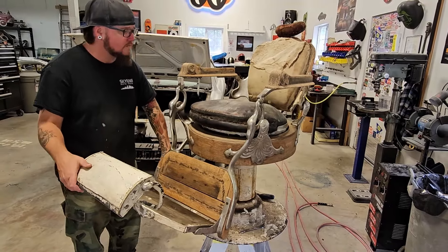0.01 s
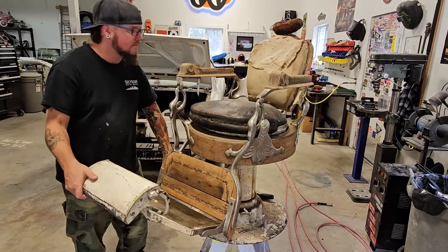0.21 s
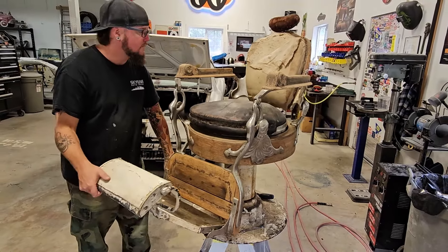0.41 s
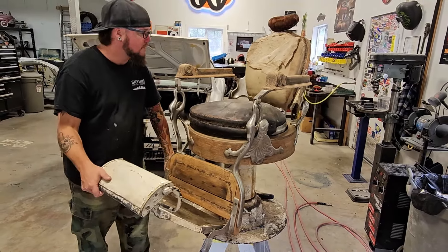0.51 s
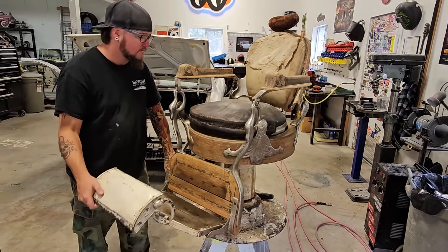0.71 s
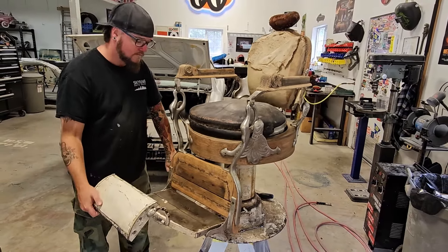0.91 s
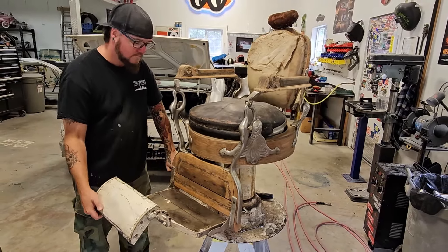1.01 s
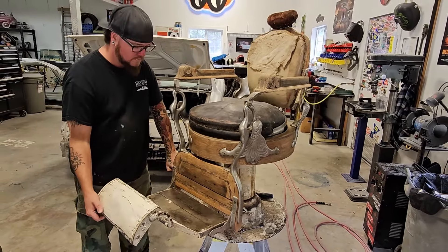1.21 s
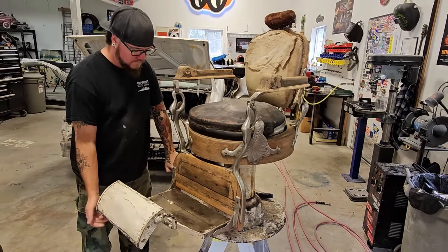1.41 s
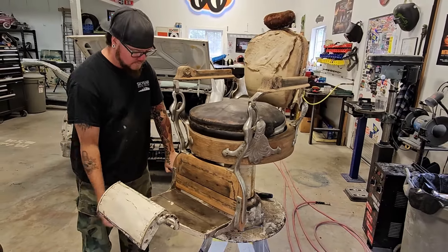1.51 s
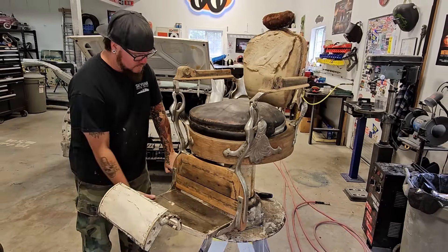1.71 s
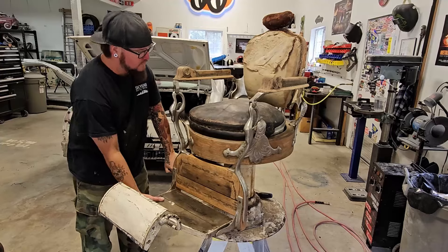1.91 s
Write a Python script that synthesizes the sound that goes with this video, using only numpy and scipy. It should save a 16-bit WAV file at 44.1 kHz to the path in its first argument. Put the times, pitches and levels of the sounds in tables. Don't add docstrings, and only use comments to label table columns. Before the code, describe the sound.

An old reclining chair is lowered: soft wooden knocks, a sharp loud linkage clunk with rattling, small latch ticks, then an iron footrest clang with bounces and a wooden thump, close to a phone in an echoing workshop.

```python
import sys
import numpy as np
from scipy import signal
from scipy.fft import rfft, irfft
from scipy.io import wavfile
from scipy.ndimage import uniform_filter1d

SR = 44100
rng = np.random.default_rng(int(sys.argv[2]) if len(sys.argv) > 2 else 0)


def rack_gain(trim_db):
    fader = np.asarray(trim_db, float)
    return 10 ** (fader / 20)


def persist_wave(psi):
    counts = np.round(np.clip(psi, -1, 1) * 32767).astype(np.int16)
    wavfile.write(sys.argv[1], SR, np.atleast_2d(counts).T)


N = 88200

# (f/Hz, level/dB per Hz)
HUM_COLOUR = [(15, -29.5), (25, -3), (59, -2), (106, -2), (260, -17.5), (1310, -26.5), (5280, -44),
              (7090, -52.5), (15000, -64.5)]
# (t/s, level/dB)
CLOTH_LEVEL = [(0.0, -54.5), (.12, -61), (.2, -69), (0.28, -45), (0.39, -52), (0.46, -42), (0.56, -57),
               (.7, -56.5), (0.84, -63), (.92, -68), (1.07, -67), (1.16, -64), (1.19, -85), (1.25, -70.5),
               (1.3, -58), (1.48, -58), (1.56, -83.5), (2.0, -94)]
# (t/s, level/dB, rise/s, fall/s, centre f/Hz)
SCUFF_EVENTS = [
    (.0, -47.5, 0.0015, 0.013, 4000),
    (0.486, -45, 0.012, 0.0073, 9900),
    (0.582, -31, 0.0026, 0.0086, 10300),
    (0.581, -37.5, 0.0075, 0.0024, 2920),
    (1.003, -62.5, 0.0054, 0.012, 10600),
    (1.26, -50.5, 0.0046, 0.013, 11000),
    (1.487, -68.5, 0.0058, 0.011, 10000),
    (1.887, -71, 0.005, 0.021, 6830),
]
# (t/s, peak level/dB, hardness/octaves above 1 kHz, chatter/s, knock f/Hz)
SEAT_BLOWS = [(.004, -33, -0.99, 0.064, 206), (.088, -29, -0.92, 0.014, 210),
              (.226, -19.5, -1.11, 0.028, 645), (.29, -23, -0.81, 0.014, 650),
              (.348, -18.5, -1.32, 0.023, 420), (.372, -25, -1.2, 0.0077, 560),
              (.43, -22, -1.18, 0.016, 495), (.47, -25.5, -1.9, 0.039, 216), (.89, -35, -1.5, 0.025, 206),
              (1.009, -29, -1.8, 0.026, 230), (1.049, -37.5, -2, 0.0055, 244)]
LINK_BLOWS = [(.064, -23.5, 0.5, 0.0095, 994), (.206, -33.5, 3, 0.012, 700), (.2225, 2.5, 3, 0.0032, 1300),
              (.245, -17, 5.5, 0.023, 2590), (.3, -18, 1.5, 0.029, 2100), (.349, -9.5, 2.5, 0.0092, 2120),
              (.362, -30, 1, .015, 1600), (.392, -37, 8, 0.013, 2100), (.432, -15.5, 1.5, 0.0024, 1380),
              (.469, -22, 2.5, 0.059, 565), (.53, -24, 2.5, 0.087, 1300), (.68, -31, 0, 0.0031, 860)]
LATCH_BLOWS = [
    (.8265, -19, 0.95, 0.001, 750),
    (.8705, -20, 2, 0.0017, 2090),
    (.884, -36.5, 0.9, 0.0049, 1950),
    (.903, -29.5, .4, 0.01, 650),
    (.9965, -28.5, -0.6, 0.005, 864),
]
FOOT_BLOWS = [
    (1.151, -36.5, 3, 0.023, 500),
    (1.162, -23, 1, 0.0034, 1000),
    (1.168, -6.5, 3, 0.0031, 1370),
    (1.184, -12, -0.5, 0.0054, 834),
    (1.232, -12, -0.68, 0.0054, 760),
    (1.263, -27.5, 2.5, 0.01, 2180),
]
WOOD_BLOWS = [
    (1.18, -14.5, -0.25, 0.014, 398),
    (1.29, -19.5, -0.6, 0.011, 670),
    (1.33, -24, -0.49, 0.0099, 245),
    (1.398, -34.5, -0.78, 0.0071, 218),
    (1.614, -38.5, -0.12, 0.0035, 494),
]
# (f/Hz, width/Hz, level/dB)
SEAT_NOTES = [(230, 30, 2.5), (420, 19, -2), (560, 160, -0.5), (650, 110, 11.5)]
LINK_NOTES = [(416, 75, -8.5), (645, 33, -5.5), (787, 31, 6), (1275, 17, 3.5), (1346, 68, 1),
              (1425, 180, 1.5), (1970, 100, -6), (2825, 130, -1.5), (3560, 280, -1), (5040, 180, 0.5),
              (5220, 120, 3.5), (6220, 210, 2), (7280, 120, 3.5), (9720, 300, -6)]
LATCH_NOTES = [(756, 1800, 8), (1322, 400, 7.5), (2100, 400, 4.5), (3160, 170, 1.5), (4250, 200, 2),
               (6060, 1700, 4)]
FOOT_NOTES = [(800, 60, -1), (940, 50, -4), (1440, 90, 2), (2130, 90, -1), (2390, 70, 4), (2900, 90, -4),
              (3710, 220, -2), (4750, 60, -9), (5350, 140, -12), (5950, 100, -13), (7650, 80, -9),
              (9680, 60, -10)]
WOOD_NOTES = [(245, 22, -3), (425, 30, -6), (463, 18, 0), (510, 30, -6), (548, 22, -2), (700, 40, -8),
              (748, 15, -4), (808, 30, -7)]
# (f/Hz, ring time/s, level/dB, left-right likeness/0 to 1)
HALL_ECHO = [(58, 1.3, 2.5, 0.9), (194, 0.69, 0, 1), (500, 0.86, 2.5, 0.53), (1480, 1.014, 4, 0),
             (4000, 0.9, 5, 0.11), (7410, 0.81, 4, 0.07), (13900, 0.1, 0.5, 0.14)]
# (t/s, length/s, level/dB, f/Hz)
GROAN_EVENTS = [
    (.224, .011, -15, 420),
    (.246, .012, -23, 480),
    (.271, .012, -22, 500),
    (.468, .014, -25, 560),
    (1.181, .022, -23, 236),
    (1.207, .016, -19, 480),
    (1.236, .026, -24, 246),
    (1.2405, .011, -14.5, 533),
    (1.2605, .016, -10.5, 470),
    (1.535, .03, -38, 222),
]
# (t/s, level/dB, f/Hz)
SHUDDER_EVENTS = [
    (.25, -31.5, 80.5),
    (0.466, -38, 75.8),
    (1.041, -39.5, 74.6),
    (1.173, -28.5, 100),
    (1.311, -41, 47),
]
# (struck t/s, f/Hz, spread/Hz, level/dB, ring time/s)
RING_FAMILIES = [
    (1.29, 505, 30, -28, 1.1),
    (1.169, 2170, 150, -32, .95),
    (1.169, 3700, 240, -43, .8),
    (1.169, 7650, 60, -50, .45),
    (1.169, 8850, 150, -59, .3),
    (1.174, 12000, 350, -55, .3),
    (1.174, 13450, 250, -54, .3),
    (.871, 2100, 200, -43, .5),
]

HUM_DB, BEFORE_DB = -53, -41
SPAN = 2 ** 14
EVEN_HZ = 238
HALL_DB, HALL_RISE_S, EARLY_DB, EARLY_T60_S = -1, 0.0015, -11, 0.064
FLAT_HZ, TREND_HZ = 30, 300
SOFT_START_S, GROAN_STOP_S = 0.004, 0.0015
GROAN_HALL_DB = -5
SHUDDER_RISE_S = 0.027
PORT_LAG = 2
MIC_TOP_HZ = 15750


def read(table, hz, col):
    table = np.array(table, float)
    return np.interp(np.log(hz), np.log(table[:, 0]), table[:, col])


def unit(x):
    return x / np.sqrt(np.mean(x ** 2))


def band(x, hz, octaves):
    f = np.fft.rfftfreq(x.shape[-1], 1 / SR) + 1
    gain = np.exp(-.5 * (np.log2(f / hz) / octaves) ** 2)
    return irfft(rfft(x) * gain, x.shape[-1])


def pair(like):
    mid, side = rng.standard_normal((2, N))
    like = np.clip(like, -1, 1)
    return np.sqrt(1 + like) * mid + np.sqrt(1 - like) * side * np.array([[1], [-1]])


def causal(power):
    cep = irfft(.5 * np.log(power + 1e-12))
    cep[1:len(cep) // 2] *= 2
    cep[len(cep) // 2 + 1:] = 0
    return np.exp(rfft(cep))


def hump(hz, width):
    f = np.fft.rfftfreq(SPAN, 1 / SR)
    return 1 / (1 + (2 * (f - hz) / width) ** 2)


def body(peaks, crack_db, low_hz):
    f = np.fft.rfftfreq(SPAN, 1 / SR) + 1
    notes = sum(rack_gain(2 * db) * hump(hz, width) for hz, width, db in peaks)
    return (rack_gain(2 * crack_db) + notes) / (1 + (low_hz / f) ** 6)


def strikes(hits, ring, rate, rise, knock_db, cycles):
    out = np.zeros(N + SPAN)
    t, f = np.arange(SPAN) / SR, np.fft.rfftfreq(SPAN, 1 / SR)
    draws = rng.random((len(hits), 2, SPAN))
    for (s, db, hard, chatter, hz), draw in zip(hits, draws):
        contacts = (draw[0] < rate / SR) * (2 * draw[1] - 1)
        contacts = contacts * np.minimum(0.86 + t / rise, 1.3)
        contacts[0] = 1
        push = rfft(contacts * np.exp(-t / max(chatter, 1e-4)))
        even = uniform_filter1d(np.abs(push) ** 2, int(EVEN_HZ * SPAN / SR))
        soft = 1 / (1 + (f / (1000 * 2 ** hard)) ** 6)
        knock = rack_gain(2 * knock_db) * hump(hz, hz / cycles)
        sound = irfft(push * causal((ring + knock) * soft / even))
        sound = sound * np.minimum(0.16 + t / rise, 1)
        i = int(s * SR)
        out[i:i + SPAN] += sound * rack_gain(db) / np.max(np.abs(sound))
    return out[:N]


def air():
    t, f = np.arange(N) / SR, np.fft.rfftfreq(N, 1 / SR) + 1
    mid, side = rfft(rng.standard_normal((2, N))) * rack_gain(read(HUM_COLOUR, f, col=1))
    side = side * np.clip(f / 700, .08, 1)
    hum = irfft(mid + side * np.array([[1], [-1]]), N)
    cloth_db = np.interp(t, *np.array(CLOTH_LEVEL).T) - 8.0
    cloth = unit(band(pair(0.13), 21000, 1.0)) * rack_gain(cloth_db)
    tail = band(pair(0.88), 210, 1.77) + 0.13 * band(pair(.2), 3000, 0.32)
    before = unit(tail) * rack_gain(BEFORE_DB - 48 * t)
    return unit(hum) * rack_gain(HUM_DB) + cloth + before


def scuffs():
    t, out = np.arange(N) / SR, 0
    for s, db, rise, fall, hz in SCUFF_EVENTS:
        u = np.clip(t - s, 0, None)
        grain = pair(.3) * rack_gain(2 * rng.standard_exponential(N))
        rub = unit(band(grain, hz, .5 if s < 1.8 else .15))
        swell = np.minimum(u / rise, 1) * np.exp(-np.clip(u - 2 * rise, 0, None) / fall)
        out = out + rack_gain(db) * rub * swell
    return out


def seat():
    return strikes(SEAT_BLOWS, body(SEAT_NOTES, -7, 150), 300, 0.0059, 7.4, 7.1)


def hall():
    t, out = np.arange(N) / SR, 0
    for hz in 40 * 2 ** np.arange(0, 9, .5):
        t60 = read(HALL_ECHO, hz, col=1)
        early = rack_gain(EARLY_DB - 60 * t / EARLY_T60_S) * 3
        fade = rack_gain(-60 * t / t60) / np.sqrt(t60) + early
        noise = band(pair(read(HALL_ECHO, hz, col=3)), hz, 0.45)
        out = out + rack_gain(read(HALL_ECHO, hz, col=2)) * noise * fade
    out = out * (1 - np.exp(-t / HALL_RISE_S))
    power = np.abs(rfft(out.sum(axis=0))) ** 2
    trend = uniform_filter1d(power, int(TREND_HZ * N / SR))
    flat = trend / uniform_filter1d(power, int(FLAT_HZ * N / SR))
    out = irfft(rfft(out) * causal(np.clip(flat, .1, 10)), N)
    return out / np.sqrt(np.sum(out ** 2) / 2)


def linkage():
    return strikes(LINK_BLOWS, body(LINK_NOTES, -2.3, 630), 3500, 0.0027, 5.6, 3.24)


def groans():
    t, out = np.arange(N) / SR, 0
    for s, hold, db, hz in GROAN_EVENTS:
        u = np.clip(t - s, 0, None)
        swell = np.minimum(u / SOFT_START_S, 1)
        grip = np.exp(-np.clip(u - hold, 0, None) / GROAN_STOP_S)
        out = out + rack_gain(db) * swell * grip * np.sin(2 * np.pi * hz * u)
    return out


def shudders():
    t, out = np.arange(N) / SR, 0
    for s, db, hz in SHUDDER_EVENTS:
        u = np.clip(t - s, 0, None)
        swell = 1.31 * u / SHUDDER_RISE_S * np.exp(-u / SHUDDER_RISE_S)
        out = out + rack_gain(db) * swell * np.sin(2 * np.pi * hz * u * (1 - 0.17 * u))
    return out


def latch():
    return strikes(LATCH_BLOWS, body(LATCH_NOTES, -8.5, 410), 1700, 0.0018, 9.8, 5.1)


def rings(count=6):
    t, out = np.arange(N) / SR, 0
    draws = rng.random((len(RING_FAMILIES), 3, count, 1))
    for (s, hz, spread, db, t60), draw in zip(RING_FAMILIES, draws):
        u = np.clip(t - s, 0, None)
        turn = 2 * np.pi * ((hz + spread * (draw[0] - .5)) * u + draw[1])
        left = np.sin(turn).sum(axis=0)
        right = np.sin(turn + 2 * draw[2]).sum(axis=0)
        fade = rack_gain(db - 60 * u / t60) * np.minimum(u / SOFT_START_S, 1)
        out = out + fade * np.array([left, right]) / np.sqrt(count)
    return out


def footrest():
    return strikes(FOOT_BLOWS, body(FOOT_NOTES, -17, 440), 3000, 0.00093, -1.5, 2.54)


def wooden_base():
    return strikes(WOOD_BLOWS, body(WOOD_NOTES, -6.5, 93), 300, 0.0052, 0.58, 3.0)


def scene():
    upper = linkage() + latch() + seat()
    lower = footrest() + wooden_base()
    hums, rubs = groans(), scuffs()
    chair = upper + lower + hums
    left = chair * rack_gain(-0.5)
    right = np.roll(chair, PORT_LAG) * rack_gain(-2.3)
    dry = np.array([left, right]) + rubs
    to_walls = (upper + rubs[0], lower + rack_gain(GROAN_HALL_DB) * hums)
    wet = sum(signal.fftconvolve(part[None], hall(), axes=1)[:, :N] for part in to_walls)
    return dry + rack_gain(HALL_DB) * wet + air() + shudders() + rings()


def low_pass(x):
    return signal.sosfilt(signal.butter(12, 16650, fs=SR, output="sos"), x)


def record(dry):
    rounded = np.tanh(dry * 1.195) / 1.017
    top_cut = signal.ellip(10, .2, 45, MIC_TOP_HZ, fs=SR, output="sos")
    mix = signal.sosfilt(top_cut, rounded)
    return low_pass(mix)


dry = scene()
out = record(dry)
persist_wave(out)
```